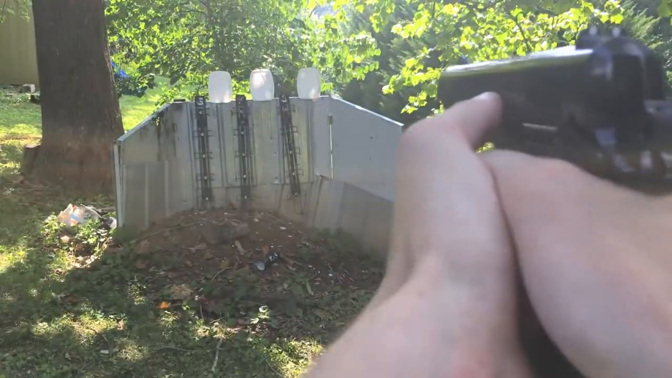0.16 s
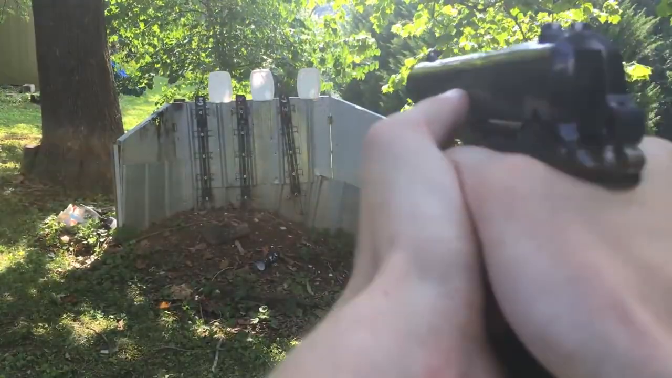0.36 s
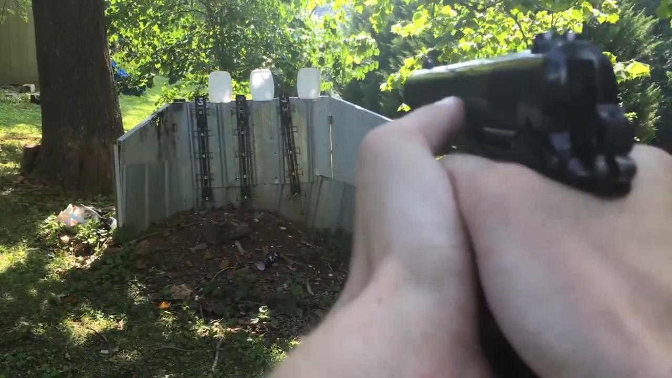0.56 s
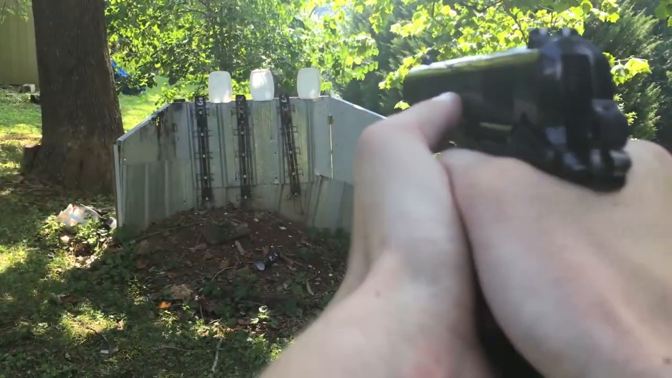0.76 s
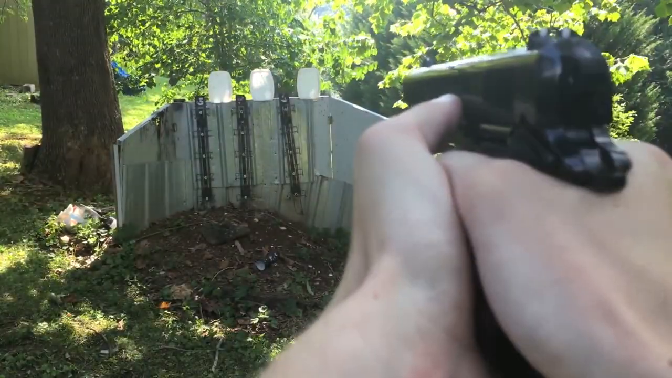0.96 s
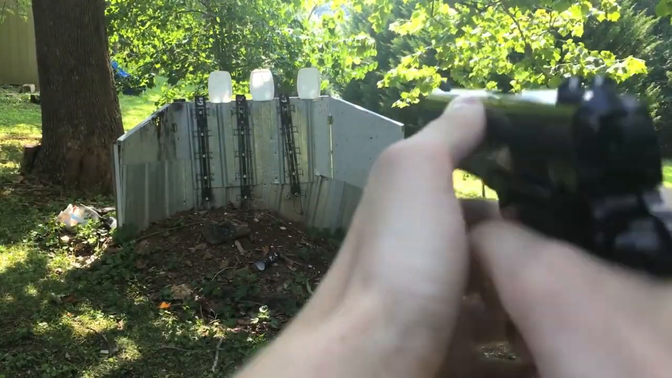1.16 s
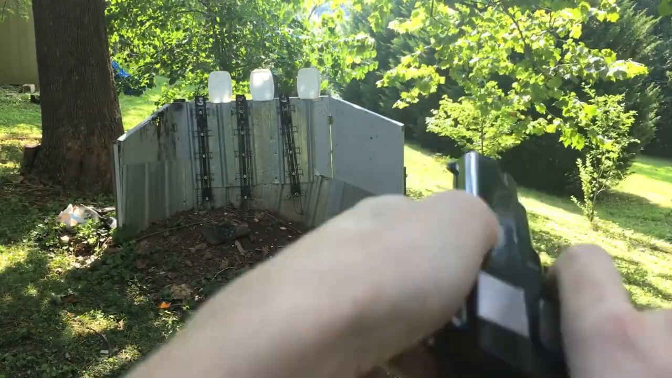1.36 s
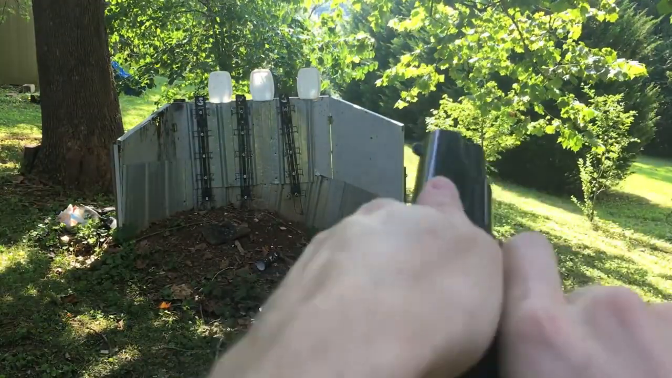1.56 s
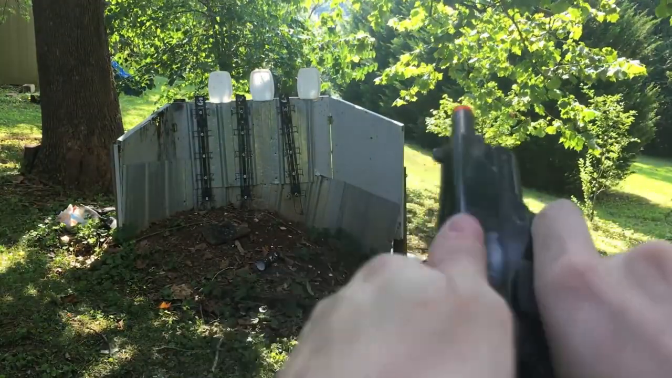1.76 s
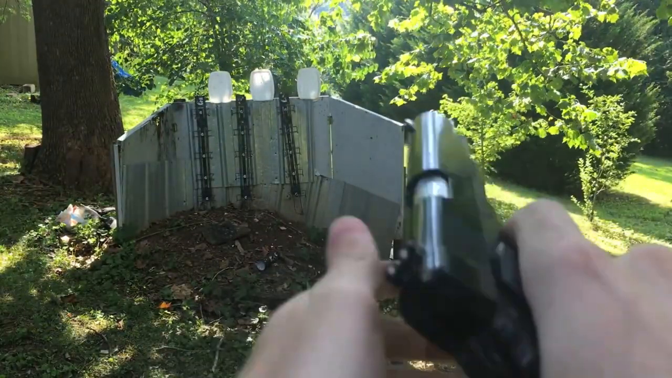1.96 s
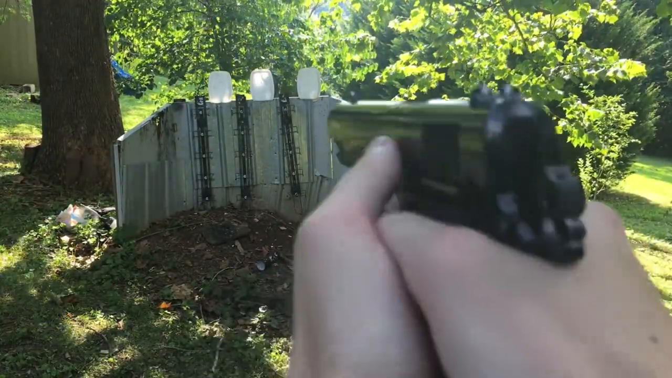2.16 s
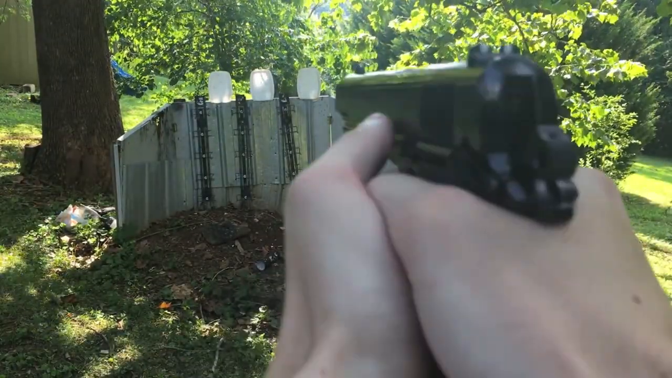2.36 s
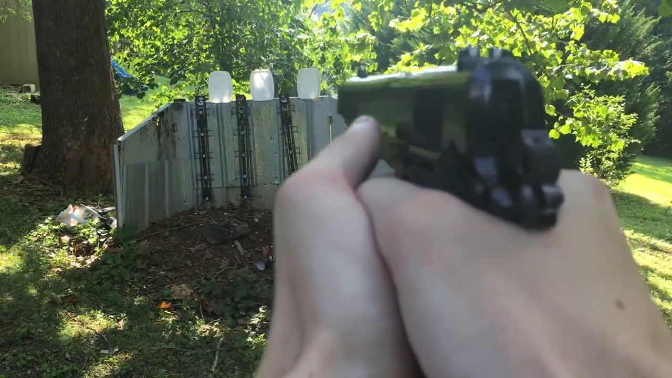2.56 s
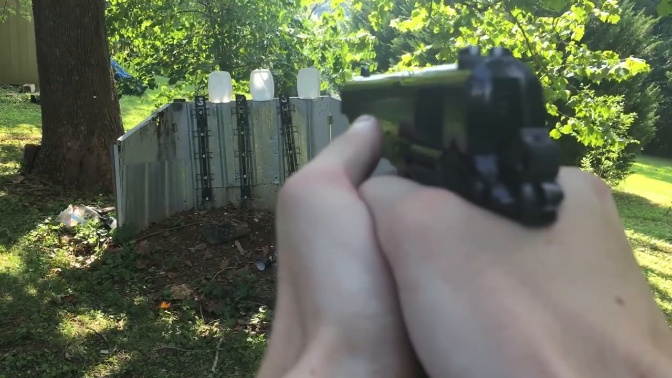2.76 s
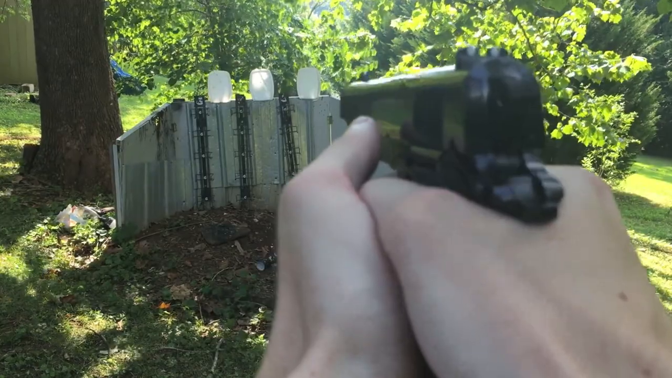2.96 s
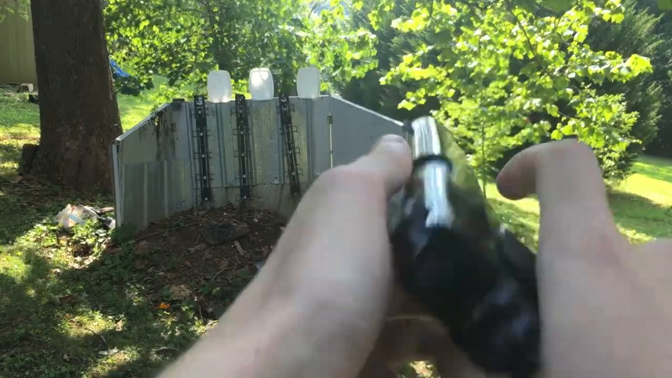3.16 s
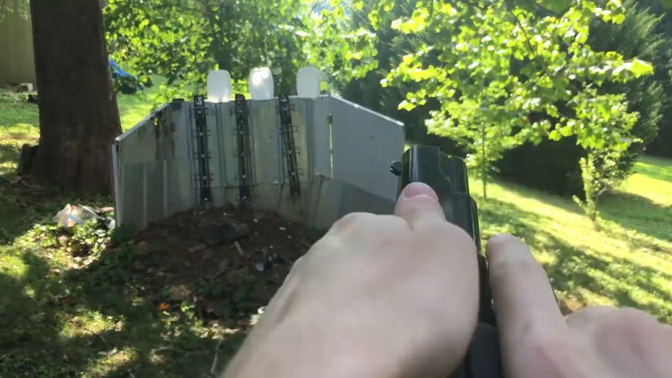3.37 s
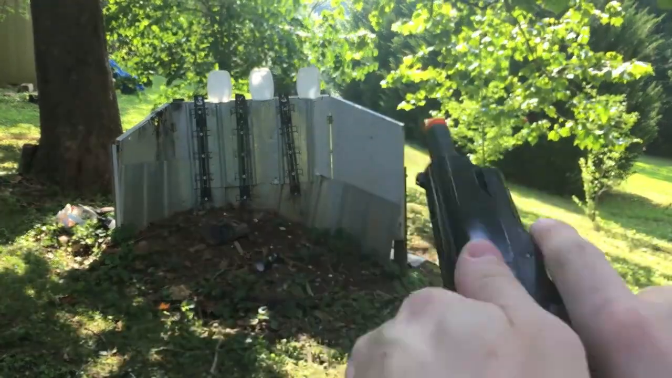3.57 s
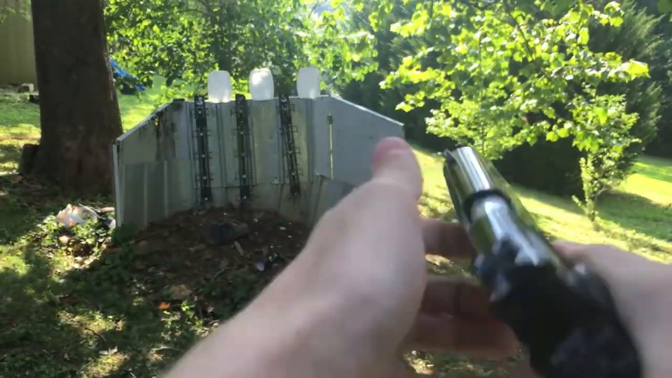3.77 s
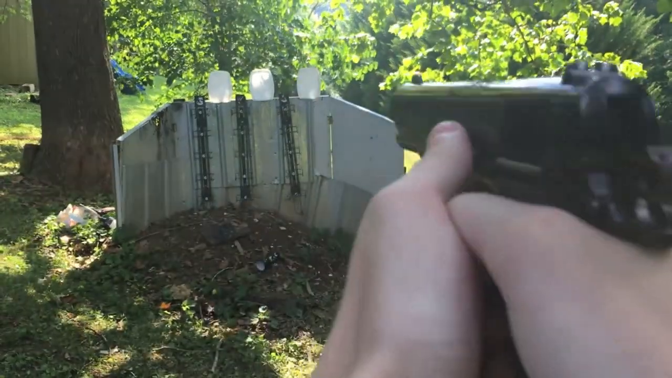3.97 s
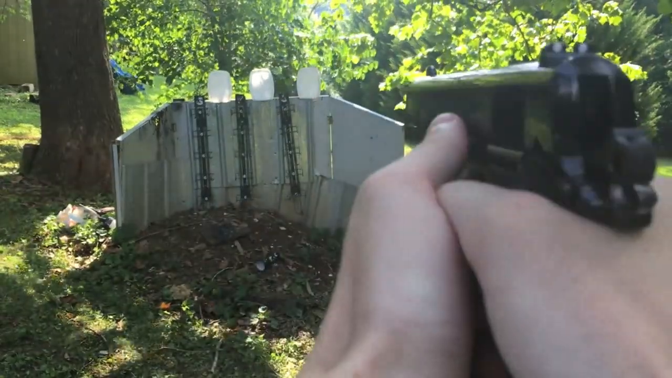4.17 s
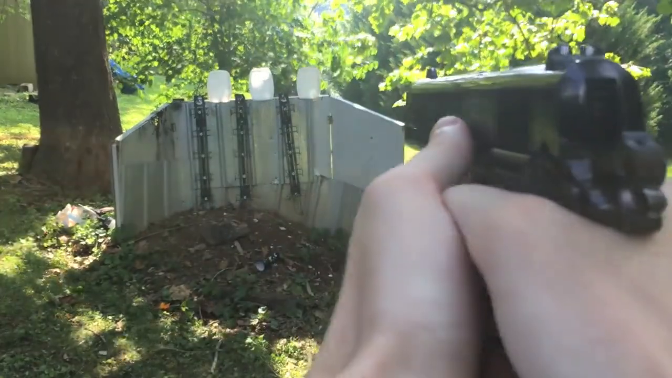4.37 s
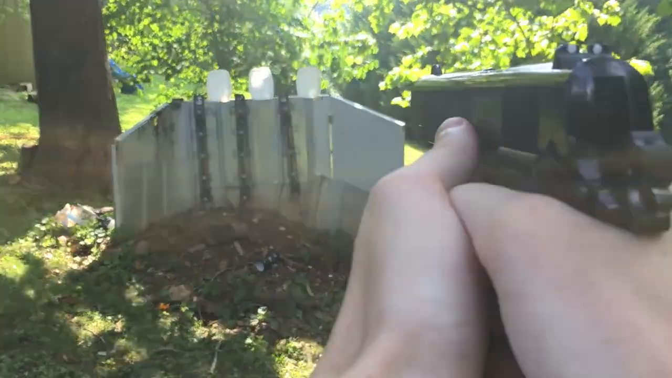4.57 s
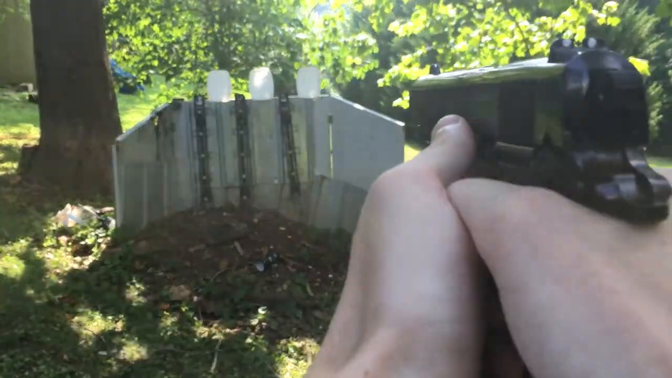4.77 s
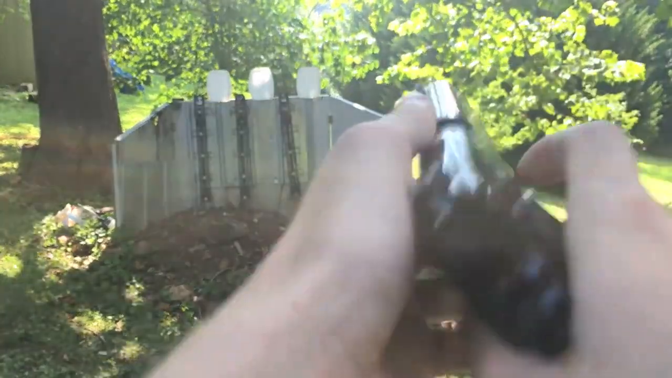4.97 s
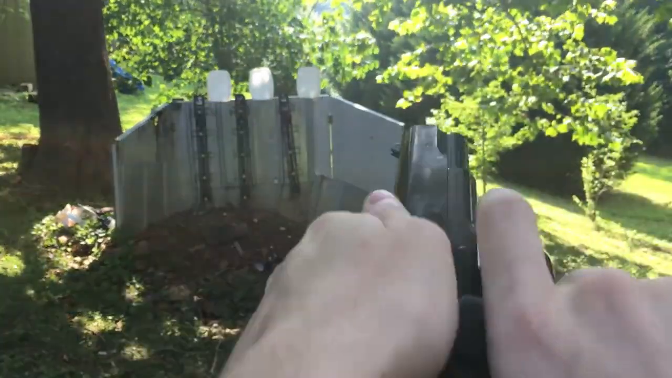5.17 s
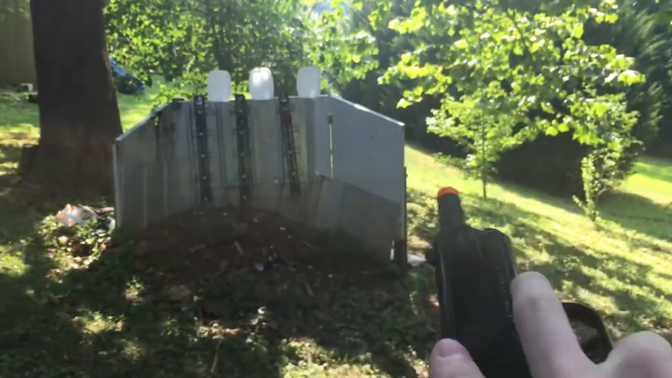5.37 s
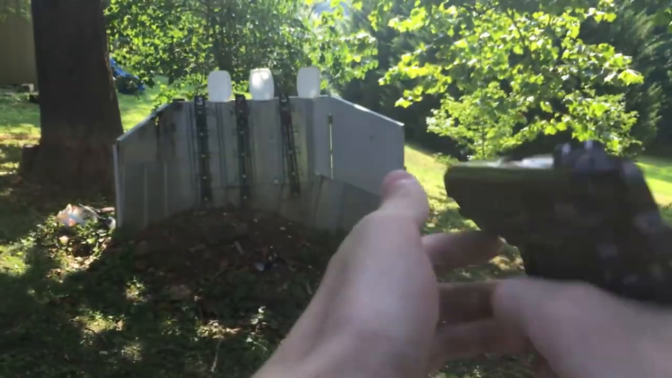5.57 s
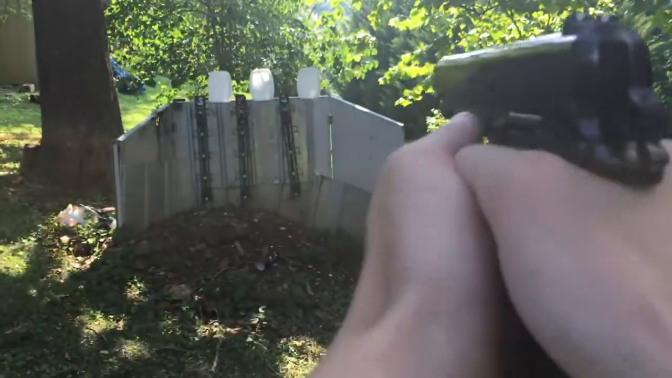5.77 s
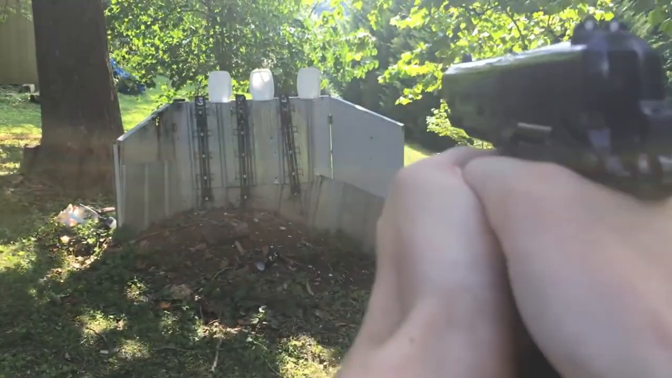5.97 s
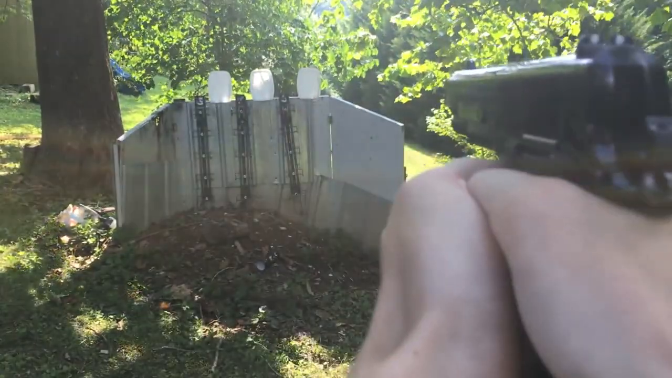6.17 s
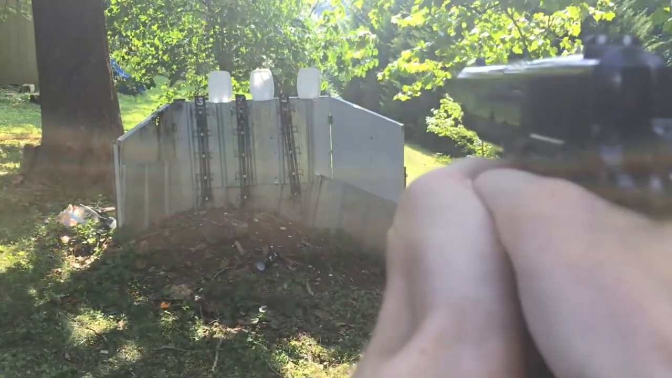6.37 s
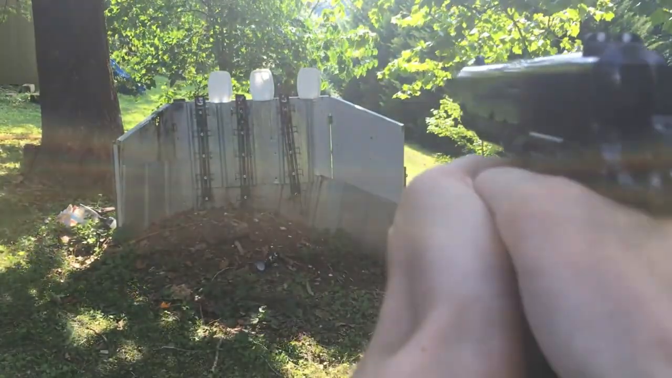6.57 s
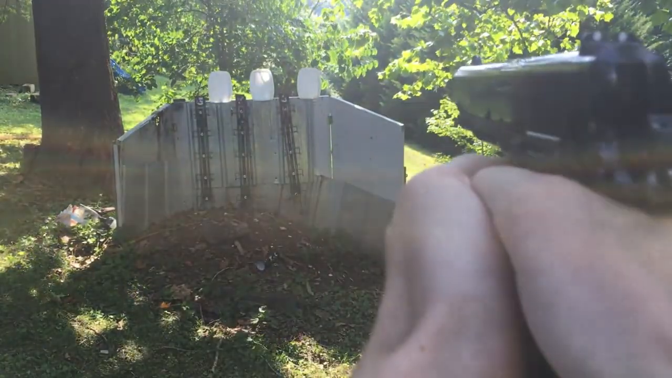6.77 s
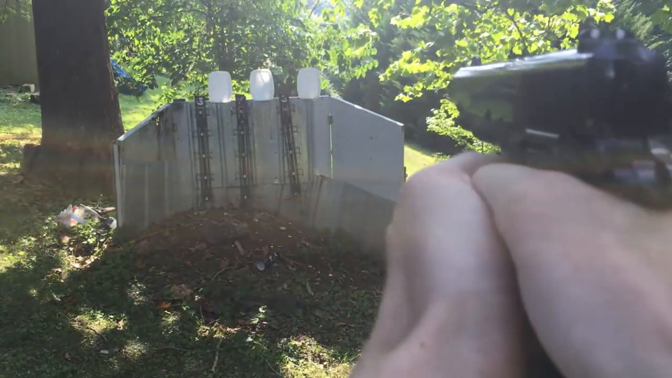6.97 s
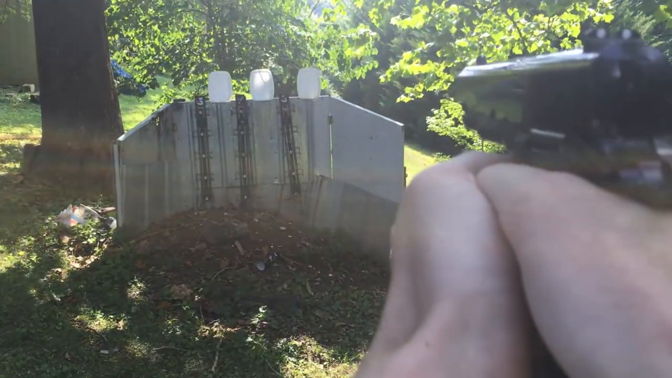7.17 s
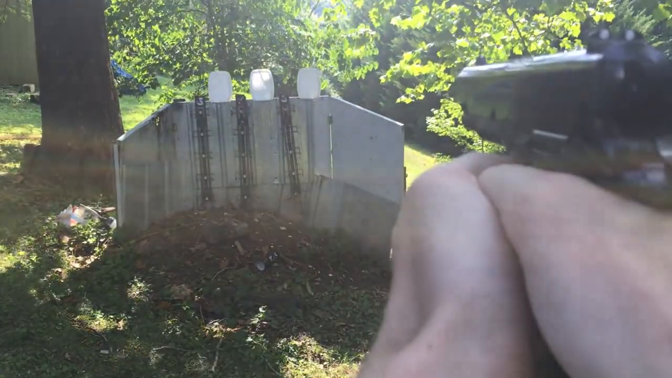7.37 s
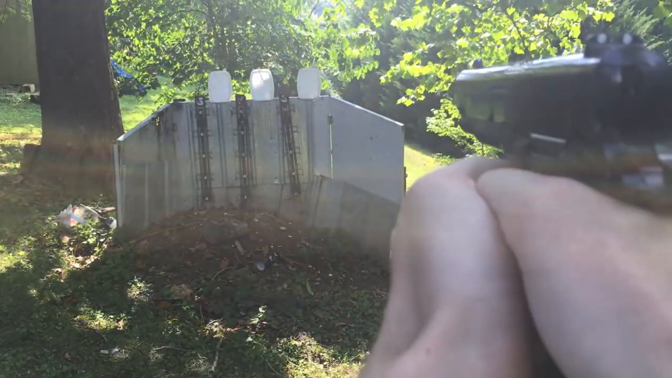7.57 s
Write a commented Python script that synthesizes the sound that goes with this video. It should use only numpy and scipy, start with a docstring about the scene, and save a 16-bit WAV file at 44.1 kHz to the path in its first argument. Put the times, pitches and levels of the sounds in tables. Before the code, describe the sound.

Wind buffets a nearby phone microphone in a leafy yard. A small air pistol cracks, its pellet smacks a fence an instant later, and the yard echoes briefly. The slide is pulled back with a scrape and clack, then released with another snap. This cycle happens three times before a fourth shot, which ends with faint, dull pellet bounces. Small handling ticks, soft hiss and a faint steady hum remain underneath.

```python
"""A spring-piston air pistol fires four times in a yard, close to a phone; rough blows of its piston ring the body
and a low puff of air follows. About 0.09 s after each shot the pellet smacks a fence, and the yard echoes.
After each of the first three shots the slide is racked back and snaps home, as clacks and scraping noise.
After the last shot come a few dull far bounces of the pellet.
All along, wind noise buffets the microphone over a faint hum and the hiss of the yard."""
import sys
import numpy as np
from scipy import signal
from scipy.fft import rfft, irfft
from scipy.io import wavfile
from scipy.ndimage import uniform_filter1d

SR = 44100
rng = np.random.default_rng(int(sys.argv[2]) if len(sys.argv) > 2 else 0)


def to_wav(sig):
    """Store sig (one row per channel, or 1-D mono) as 16-bit WAV at the path in sys.argv[1].

    Samples outside -1..1 are clipped; the rate is SR.
    """
    pcm = np.clip(np.atleast_2d(sig), -1, 1) * 32767
    pcm = np.round(pcm).astype(np.int16)
    wavfile.write(sys.argv[1], SR, pcm.T)  # frames by channels


N = 336021

# Levels in the tables are relative: later gains still shift them. Fade times are the seconds to fall by 60 dB.
# The shots. Each row: start in seconds, level in dB.
SHOTS = [(0.9998, 0), (3.0021, 1), (4.7506, 1.5), (6.9668, 1.5)]
# Tones at which the pistol body rings. Each row: pitch in Hz, level in dB, fade time in seconds.
PISTOL_MODES = [(794, -1.5, 0.026), (1152, -51, 0.038), (1626, 4, 0.041), (2250, 0.5, 0.038),
                (3156, -16, 0.079), (4490, 3, 0.016), (8550, -51, 0.013), (9460, -2, 0.015),
                (12210, -5, 0.042)]


def undb(db):
    """Turn decibels into a plain amplitude factor."""
    return 10 ** (np.asarray(db) / 20)


def level(x, db):
    """Scale a sound so that its average (rms) level is db."""
    return x * undb(db) / np.sqrt(np.mean(x ** 2))


def colour(x, spectrum, size=4096):
    """Filter with the given (Hz, dB) shape that never sounds ahead of its input; unit power gain."""
    hz, db = np.transpose(spectrum)
    grid_hz = np.arange(size // 2 + 1) * SR / size
    log_gain = np.interp(np.log(grid_hz + 1), np.log(hz), db) * np.log(10) / 20
    # folding the cepstrum (spectrum of the log gain) forward packs the filter's energy at its start
    cepstrum = irfft(log_gain)
    cepstrum[1:size // 2] *= 2
    cepstrum[size // 2 + 1:] = 0
    taps = irfft(np.exp(rfft(cepstrum)))
    return signal.fftconvolve(x, taps / np.sqrt(np.sum(taps ** 2)))[:len(x)]


def bandpass(x, order, low_hz, high_hz):
    """Keep only the part of a sound between two pitches."""
    return signal.sosfilt(signal.butter(order, [low_hz, high_hz], "band", fs=SR, output="sos"), x)


def highpass(x, order, hz):
    """Remove what lies below a pitch."""
    return signal.sosfilt(signal.butter(order, hz, "high", fs=SR, output="sos"), x)


def ring(hz, t60, size=8192):
    """One pure tone that dies away by 60 dB in t60 seconds."""
    t = np.arange(size) / SR
    return np.sin(2 * np.pi * hz * t) * 1000. ** (-t / t60)


def struck(force, modes, crack, ring_db):
    """A body answers a force with a broad crack and with its own ringing tones."""
    body = sum(undb(db) * ring(hz, t60) for hz, db, t60 in modes)
    body = body / np.sqrt(np.sum(body ** 2))
    return colour(force, crack) + undb(ring_db) * signal.fftconvolve(force, body)[:N]


def add(out, s, sound):
    """Mix a sound into out, starting at s seconds."""
    i = int(round(s * SR))
    out[i:i + len(sound)] += sound[:len(out) - i]


def walk(rate):
    """Random levels, each held 1 / rate seconds and smoothed twice; spread near 1."""
    k = int(SR / rate)
    steps = np.repeat(rng.standard_normal(N // k + 1), k)
    return 0.9 * uniform_filter1d(uniform_filter1d(steps, k), k)[:N]


def blows(rows, split_hz=4000, tick_db=6, rise=.0, knock_db=5):
    """Rough contact force: a first tick, then uneven chatter that swells, holds and dies."""
    # Each row: start in seconds, level in dB, hold in seconds, fade time in seconds,
    # brightness (gain of the treble) in dB, knock in Hz
    out, t = np.zeros(N), np.arange(4096) / SR
    soft = signal.butter(1, split_hz, fs=SR)
    chatters = rng.laplace(size=(len(rows), len(t)))
    for (s, db, hold, t60, bright_db, hz), chatter in zip(rows, chatters):
        swell = 1 - np.exp(-(t + 1 / SR) / (rise * t60 + 1 / SR))  # long clacks also build up slowly
        fade = 1000. ** (-np.maximum(t - hold, 0) / max(t60, .002))
        tick = undb(tick_db) * np.exp(-t / 0.000089)
        force = chatter * swell * (fade + tick)
        dull = signal.lfilter(*soft, force)
        treble = force - dull
        # the struck part flexes broadly (low Q) around its knock pitch
        knock = signal.lfilter(*signal.iirpeak(hz, 3.5, fs=SR), force)
        add(out, s, undb(db) * (dull + undb(bright_db) * treble + undb(knock_db) * knock))
    return out


def shots():
    """The piston rattles down the cylinder and slams home; a low puff of air follows."""
    # Blows of the piston once the trigger catch lets go. Each row: delay in seconds, level in dB,
    # hold in seconds, fade time in seconds, brightness in dB, knock in Hz.
    stroke = [(0, -13.5, 0.0061, 0.0066, 1, 3160), (.0045, -23.5, 0.00077, 0.02, -24, 2300),
              (.007, -17, .004, .012, -2.5, 800), (0.011, -18.5, 0.00073, 0.022, 12, 1600)]
    # Air shoved out of the barrel. Each row: delay in seconds, pitch in Hz, level in dB,
    # fade time in seconds, +1 for push or -1 for suction.
    puff_rows = [(.0025, 385, -16, .06, 1), (.007, 220, -9, .02, 1), (.0093, 125, -5, .03, -1),
                 (.0125, 60, -11, .13, 1)]
    # Colour of the piston's crack. Each row: pitch in Hz, level in dB per Hz.
    shot_crack = [(260, -26.5), (450, -7.5), (930, -6), (1580, -2.5), (1920, -7.5), (2330, -5), (3740, -10),
                  (4210, -13), (5030, -11), (13200, -12.5), (15500, -15)]
    rows = [(s + lag, db + hit_db, *shape) for s, db in SHOTS for lag, hit_db, *shape in stroke]
    force = blows(rows, tick_db=-15, rise=0.077)
    puff = np.zeros(N)
    for s, db in SHOTS:
        for lag, hz, puff_db, t60, sign in puff_rows:
            add(puff, s + lag, sign * undb(db + puff_db) * ring(hz, t60))
    return struck(force, PISTOL_MODES, shot_crack, ring_db=-6.0), puff


def pellets():
    """A short hard smack rings the fence after each shot; dull far bounces end it."""
    # Pellets on the fence. Each row: start in seconds, level in dB, brightness in dB.
    hits = [(1.0921, 2, -4.5), (3.0959, 0.5, -1), (4.8439, -1, -3.5), (7.0594, 4.5, -16)]
    # The pellet rolling to rest far off. Each row: start in seconds, level in dB.
    bounces = [(7.3974, -34), (7.511, -34), (7.553, -35), (7.5785, -37)]
    # Tones of the fence panel. Each row: pitch in Hz, level in dB, fade time in seconds.
    fence_modes = [(1043, 1, 0.13), (1782, 9, 0.031), (2250, 17.5, 0.0078), (3040, 1, 0.068),
                   (4520, -33, 0.0069)]
    # Colour of the fence's crack. Each row: pitch in Hz, level in dB per Hz.
    fence_crack = [(290, -36), (500, -9), (2930, 3), (4070, 3), (4700, -16), (5350, 0), (7670, -2),
                   (8980, -1), (15500, -24)]
    rows = [(s, db, .001, .03, bright_db, 3000) for s, db, bright_db in hits]
    rows += [(s, db, .002, .02, -12, 2900) for s, db in bounces]
    force = undb(-15.0) * blows(rows, tick_db=16, knock_db=-9.5)
    return struck(force, fence_modes, fence_crack, ring_db=-8.5)


def hands():
    """Parts click against each other; the slide slips and catches as it scrapes, each stroke at its own pace."""
    # Slide pulled back. Each row: time of the catch's click in seconds, level in dB,
    # travel from catch to back stop in seconds, knock of the last clack in Hz.
    pulls = [(1.81, 0, 0.022, 3200), (3.682, 2.8, .021, 1950), (5.4315, 0.7, .0215, 2020)]
    # Slide let go. Each row: time it seats in seconds, level in dB,
    # travel from release to seat in seconds, knock of the last clack in Hz.
    returns = [(1.9555, 1.2, 0.02, 2050), (3.825, 0, .028, 2210), (5.585, -0.2, .027, 3060)]
    # Clacks of one pull: grip, catch, spring, back stop. Each row: delay in travels, level in dB,
    # fade time in seconds, brightness in dB, knock in Hz (None takes the stroke's own).
    pull_clacks = [(-1.19, -19.5, 0.034, -1, 3100), (0, -5.5, 0.014, 5.5, 4240), (.76, -1, 0.012, 3, 3800),
                   (1.02, 1.5, 0.023, 1.5, None)]
    # Clacks of one return: release, two notches, seat, rebound. Each row: as for a pull.
    return_clacks = [(-1.1, -24, 0.044, 4, 1900), (-.47, -19, 0.022, 8, 2000),
                     (-.17, -8.5, 0.0036, -1, 2400), (0, 0.5, 0.012, 3, 1340), (.33, -3, 0.028, 8, None)]
    # Scraping along the frame. Each row: start in travels, end in travels, first level in dB, last level in dB.
    pull_scrapes = [(-.9, 0, -45, -21), (0.15, .7, -19, -15), (.7, 1.15, -14.5, -7), (1.3, 2.15, -21, -36)]
    return_scrapes = [(-.45, 0.81, -26, -13), (0.02, .55, -13, -4), (.55, 1.3, -24, -54)]
    # Small ticks of trigger, grip and loose parts. Each row: start in seconds, level in dB, brightness in dB.
    ticks = [(.21, -45, 12), (0.962, -31, 15.5), (1.27, -41.5, 17), (1.753, -38, -2), (1.779, -32, 3),
             (1.799, -20, -3), (1.877, -25.5, 1), (1.887, -21.5, -1), (1.939, -19, 11), (2.506, -40.5, 17),
             (2.922, -44.5, 21.5), (3.695, -15, 2), (3.743, -20.5, -5), (3.751, -22.5, 0), (3.765, -32, -3),
             (4.183, -40.5, 13.5), (4.29, -35.5, 11.5), (5.122, -30.5, 5), (5.306, -25, -5), (5.4, -29, -3),
             (5.421, -29, -1), (5.501, -23, -6), (5.531, -25, -4), (5.851, -43, 17), (6.058, -40.5, 16.5),
             (6.928, -41, 17.5)]
    # The trigger creeps just before each shot: lead in seconds, level in dB, hold in seconds,
    # fade time in seconds, brightness in dB, knock in Hz.
    lead, *creep = (.019, -40, .004, .04, 8, 1300)
    # Colour of the slide's crack. Each row: pitch in Hz, level in dB per Hz.
    slide_crack = [(240, -21), (400, -52), (1120, 5), (1450, -2), (1790, 4.5), (2920, 4.5), (5000, -0.5),
                   (9210, -3.5), (15500, -10)]

    strokes = [(pulls, pull_clacks, pull_scrapes), (returns, return_clacks, return_scrapes)]
    rows = [(s, db, .001, 0.016, bright_db, 2900) for s, db, bright_db in ticks]
    rows += [(s - lead, *creep) for s, _ in SHOTS]
    for moves, clacks, _ in strokes:
        for s, db, travel, last_hz in moves:
            for lag, hit_db, t60, bright_db, hz in clacks:
                rows.append((s + lag * travel, db + hit_db, .001, t60, bright_db, hz or last_hz))
    force = blows(rows, tick_db=-21, rise=0.012)

    grit = level(undb(2.5 * walk(700)) * rng.standard_normal(N), 3.0)
    for moves, _, scrapes in strokes:
        for s, db, travel, _ in moves:
            for start, end, from_db, to_db in scrapes:
                i, j = int((s + start * travel) * SR), int((s + end * travel) * SR)
                force[i:j] += undb(db + np.linspace(from_db, to_db, j - i)) * grit[i:j]
    return struck(undb(-13.0) * force, PISTOL_MODES, slide_crack, ring_db=-14.0)


def yard(x, gap_s=0.0033, early_db=10, early_t60=0.12):
    """Leaves and planks scatter each band into a dense wash: strong near returns, then a long far tail."""
    # Echoes from trees and fences. Each row: middle of the band in Hz, level in dB, fade time in seconds.
    echo_bands = [(573, -3, 0.2), (810, -6, 0.27), (1470, -1, 0.52), (1970, -1.5, 0.48), (3090, -2.5, 0.68),
                  (4700, -4, 0.71), (7060, -1.5, 0.6), (10550, -4.5, 0.53), (14000, -2.5, 0.27)]
    t, wash = np.arange(SR // 2) / SR, 0
    lumps = walk(90)  # single trunks and planks stand out of the wash
    for hz, db, t60 in echo_bands:
        low_hz, high_hz = hz / 1.23, min(hz * 1.23, .45 * SR)
        # these fade as power, so the decibels count double
        late = undb(-2 * 60 * t / t60)
        early = undb(2 * early_db - 2 * 60 * t / early_t60)
        fade = (late + early) * (1 - np.exp(-t / gap_s))
        power = signal.fftconvolve(bandpass(x, 2, low_hz, high_hz) ** 2, fade / np.sum(fade))[:N]
        lumpy = undb(1.74 * lumps + 2.0 * walk(40)) * rng.standard_normal(N)
        wash = wash + np.sqrt(np.maximum(power, 0)) * level(bandpass(lumpy, 2, low_hz, high_hz), db)
    return wash


def wind():
    """Turbulence at the microphone port: throbbing rumble, quicker flutter, and eddies that ring the low cut."""
    # Wind between the shots, in groups. Each row: time in seconds, rumble level in dB.
    gusts = [
        [(0.0, -47), (0.026, -34), (0.462, -24), (0.754, -43.5), (0.766, -32), (0.99, -32)],
        [(1.06, -40), (1.15, -48.5), (1.656, -28.5), (1.676, -41.5), (1.824, -32.5), (2.0, -46)],
        [(2.02, -44), (2.11, -23), (2.144, -48), (2.268, -28.5), (2.976, -25.5), (2.99, -46)],
        [(3.06, -27), (3.124, -34), (3.386, -27), (3.798, -44), (4.214, -24), (4.74, -29.5)],
        [(4.81, -43), (4.842, -26.5), (5.268, -31.5), (5.28, -25), (5.824, -28), (5.9, -37)],
        [(5.92, -26), (5.948, -37.5), (6.074, -25), (6.568, -23.5), (6.894, -41), (6.95, -41)],
        [(7.03, -33), (7.258, -41.5), (7.268, -38), (7.474, -26.5), (7.532, -56), (7.62, -26.5)],
    ]
    # Colours of rumble and flutter. Each row: pitch in Hz, level in dB per Hz.
    rumble_colour = [(8.8, -38), (15, -20.5), (40, -2), (65, 4.5), (92, 0.5), (200, -15), (260, -42.5),
                     (440, -120)]
    flutter_colour = [(60, -32), (110, 1.5), (160, -0.5), (250, -7), (400, -24.5), (700, -41), (1200, -63),
                      (3000, -110)]
    # Single eddies that strike the port. Each row: start in seconds, level in dB.
    eddy_rows = [(0.073, -12), (.201, -22), (0.319, -15.5), (0.486, -19), (.775, -24.5), (1.6, -22),
                 (2.273, -8.5), (2.562, -15.5), (2.773, -19.5), (2.972, -10.5), (3.153, -16.5),
                 (3.281, -7.5), (3.374, -14), (3.494, -23), (4.131, -14.5), (4.291, -16), (4.349, -24),
                 (4.383, -13.5), (4.517, -13.5), (4.982, -20), (5.285, -4), (5.31, -10), (5.488, -15.5),
                 (5.665, -20), (6.093, -8.5), (6.207, -18), (6.296, -23), (6.378, -20), (6.428, -19),
                 (6.463, -21), (6.5, -13.5), (6.581, -16), (7.043, -11)]
    eddy_s, wake_s, wake_rise_s = 0.0042, 0.038, 0.0044  # an eddy's length; its wake's fade and rise

    t = np.arange(N) / SR
    gust_db, throb = np.interp(t, *np.vstack(gusts).T), walk(22)
    rumble = level(colour(undb(3.46 * throb) * rng.standard_normal(N), rumble_colour, size=16384), 0)
    flicker = undb(5.5 * throb + 4.7 * walk(60))
    flutter = level(colour(flicker * rng.standard_normal(N), flutter_colour, size=16384), 0)
    # finer swirls at the front of a wake
    swirls = level(bandpass(rng.standard_normal(N), 3, 194, 503), -19.5)

    eddies, wake, front, u = np.zeros(N), np.zeros(N), np.zeros(N), t[:8192]
    for when, db in eddy_rows:
        add(eddies, when, -undb(db) * signal.windows.hann(max(int(eddy_s * SR), 8)))
        shape = (1 - np.exp(-(u / wake_rise_s) ** 2)) * np.exp(-u / wake_s)
        add(wake, when, undb(db - 16) * shape)  # turbulence that trails the eddy
        add(front, when - 2 * wake_rise_s, undb(db) * shape ** 3)
    eddies = highpass(eddies, 4, 65)

    # flutter sits 9.5 dB under a rumble of -26 dB, and gains on it by 0.47 dB per dB of gust
    flutter_db = -9.5 + 0.47 * (gust_db + 26)
    rumbling = (undb(gust_db) + wake) * rumble
    fluttering = (undb(gust_db + flutter_db) + undb(-2.5) * wake) * flutter
    return rumbling + fluttering + front * swirls + eddies


def air():
    """Leaves and far traffic as a smooth hiss, with the almost steady hum of far machinery."""
    # Colour of the hiss. Each row: pitch in Hz, level in dB per Hz.
    hiss_colour = [(150, -9), (300, -7), (500, -11.5), (1000, -13), (2000, -16), (3200, -20), (5000, -28),
                   (7200, -25), (8200, -31), (9400, -26.5), (10400, -32), (11500, -27), (13000, -35.5),
                   (13900, -36), (15300, -33)]
    # Far machinery. Each row: pitch in Hz, rms level in dB.
    hum_tones = [(239.5, -51), (205, -59.5)]
    hiss = undb(0.3 * walk(3) + 0.8 * walk(9)) * colour(rng.standard_normal(N), hiss_colour)
    t, hum = np.arange(N) / SR, 0
    for hz, db in hum_tones:
        # a sine's peak is the square root of 2 times its rms level
        hum = hum + np.sqrt(2) * undb(db + 0.4 * walk(6)) * np.sin(2 * np.pi * hz * t)
    return level(hiss, -51) + hum


def scene():
    """Mix the direct sounds, their echoes, the wind and the air of the yard."""
    crack, puff = shots()
    smack, clicks = pellets(), hands()
    # the muzzle and the fence face the yard; the slide is shielded by the hands
    echoes = yard(undb(-11.5) * crack + undb(-6.0) * smack + undb(-26.5) * clicks)
    return (crack + puff + smack + clicks + echoes + wind() + air())[None]


def record(dry):
    """The phone drops the deepest bass, rounds the loudest peaks, rolls off and cuts the top."""
    cut = highpass(dry, 2, 22)
    rounded = np.tanh(1.154 * cut) / 1.106
    rolled = signal.sosfilt(signal.ellip(6, .3, 22, 15800, fs=SR, output="sos"), rounded)
    return signal.sosfilt(signal.ellip(12, .2, 95, 16800, fs=SR, output="sos"), rolled)


dry = scene()
out = record(dry)
to_wav(out)
```